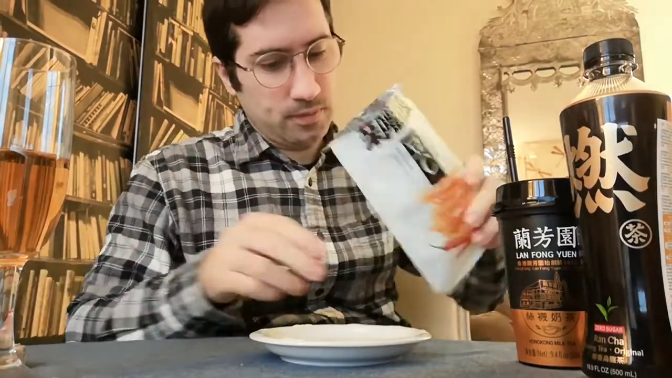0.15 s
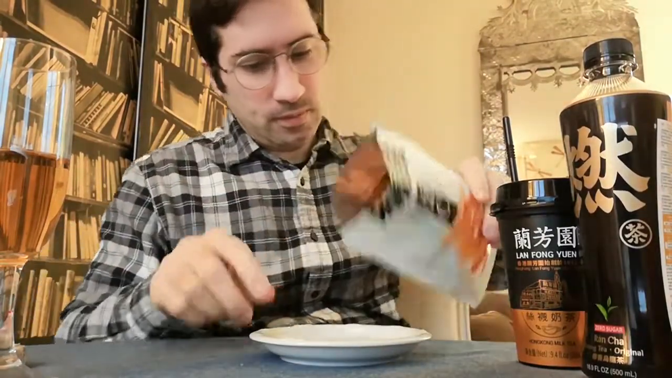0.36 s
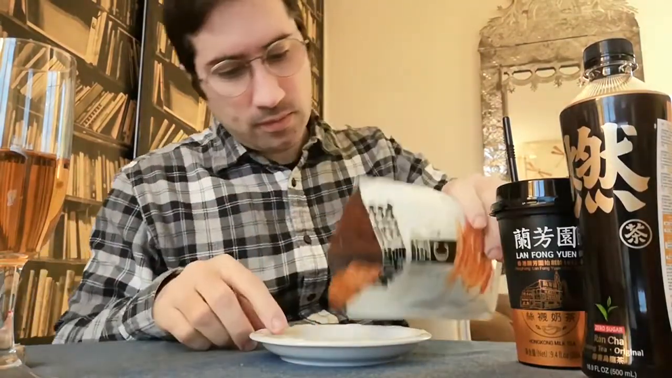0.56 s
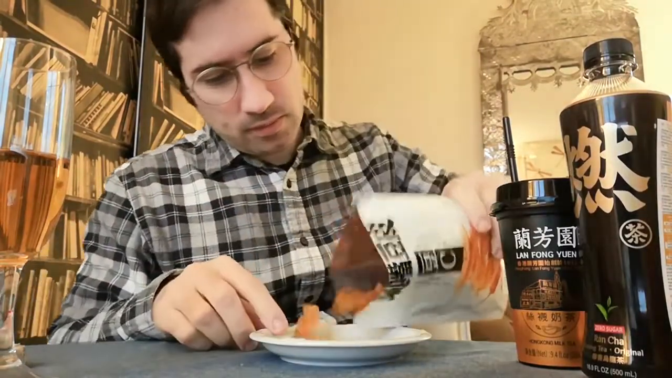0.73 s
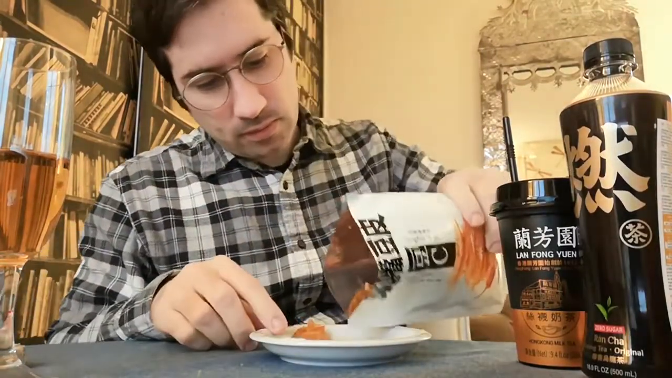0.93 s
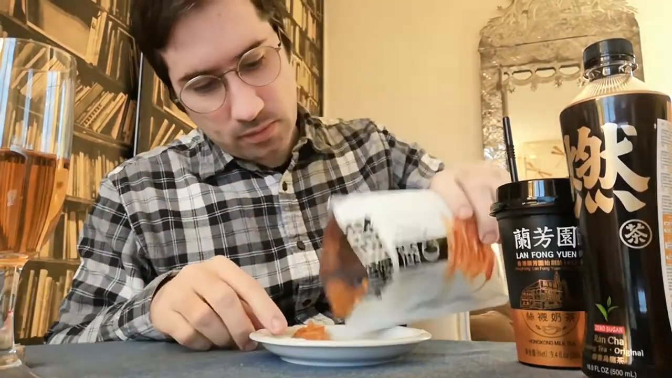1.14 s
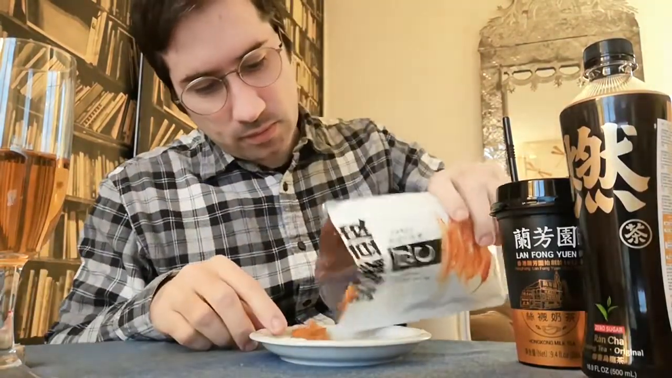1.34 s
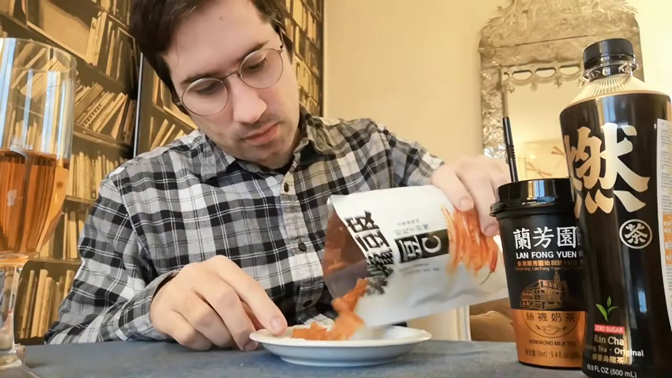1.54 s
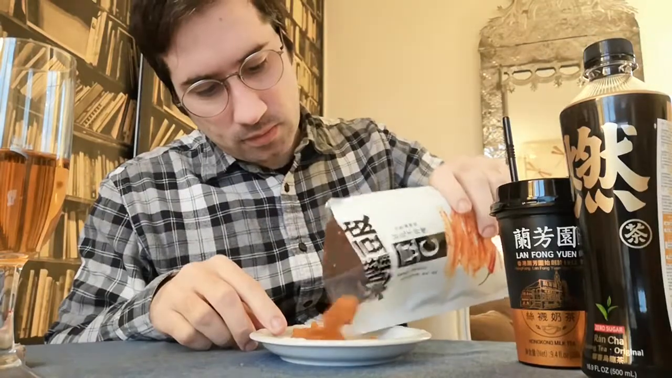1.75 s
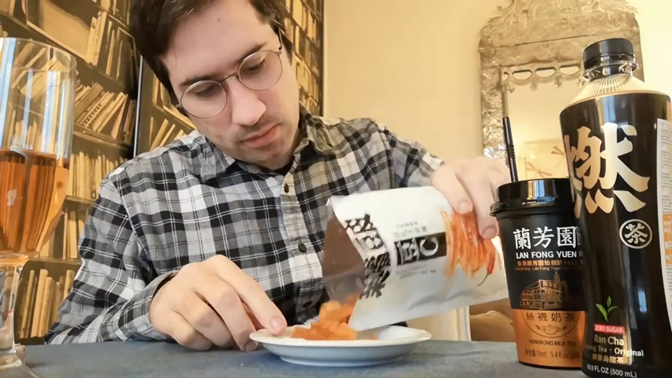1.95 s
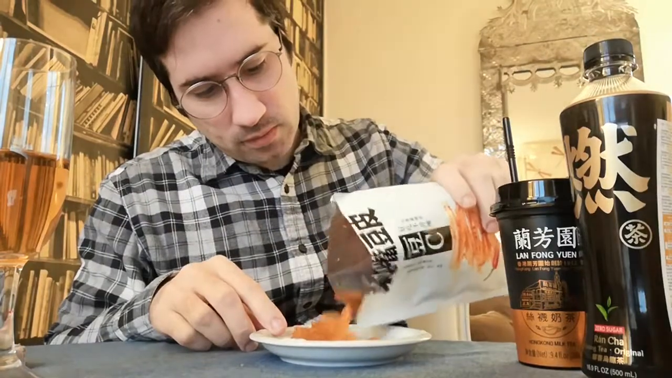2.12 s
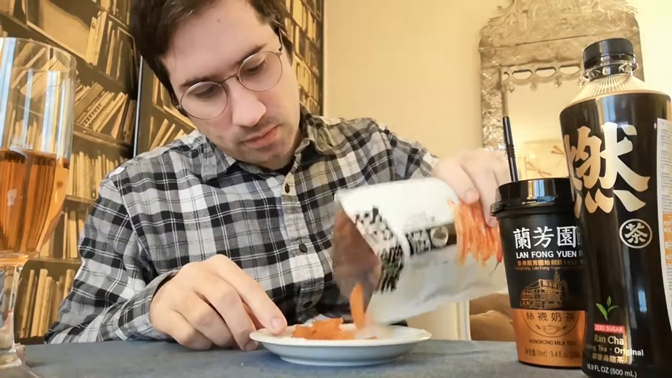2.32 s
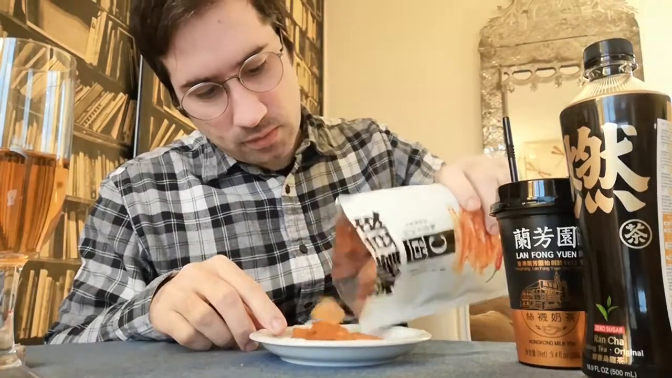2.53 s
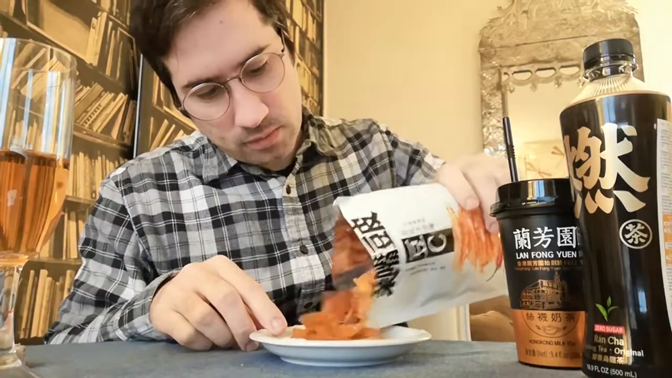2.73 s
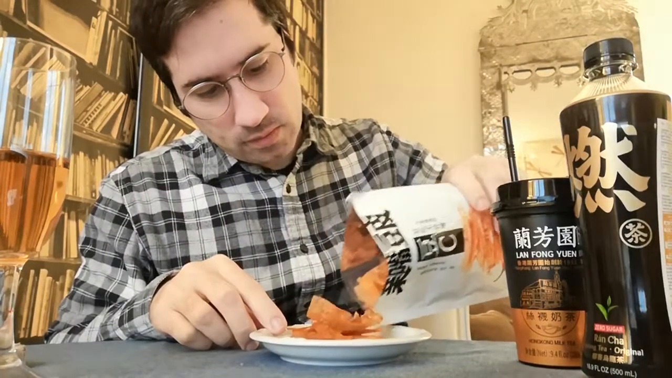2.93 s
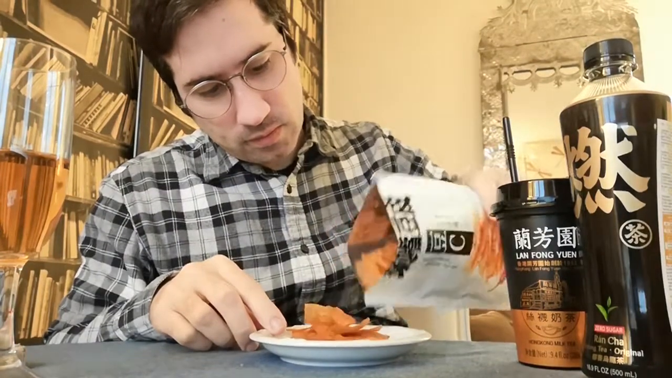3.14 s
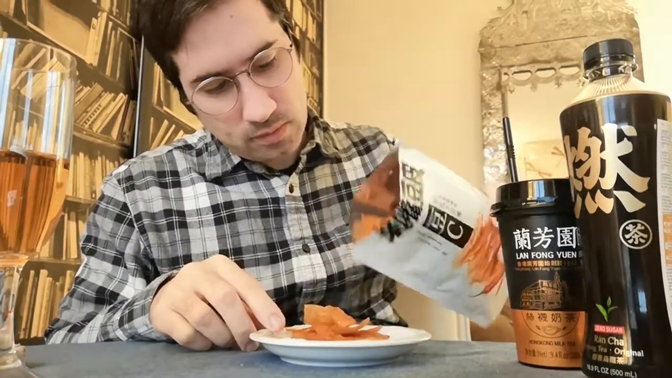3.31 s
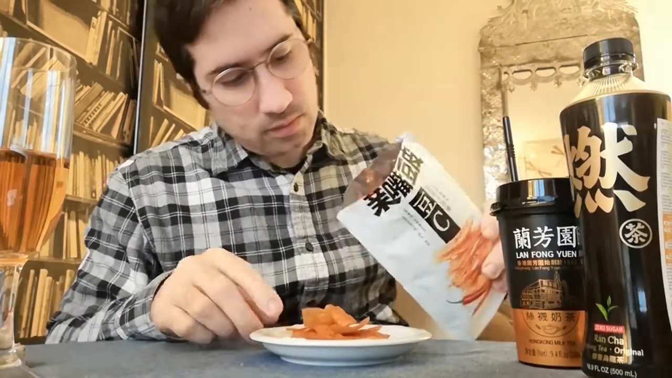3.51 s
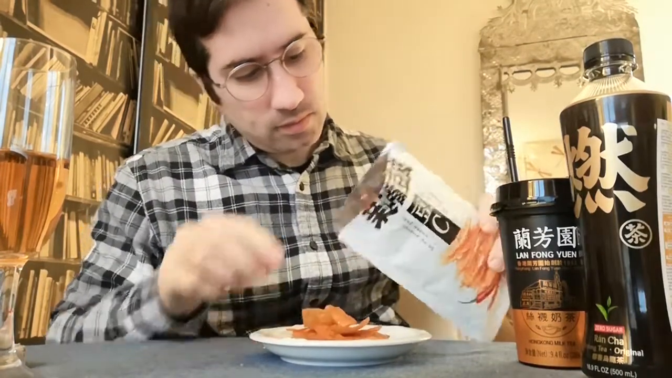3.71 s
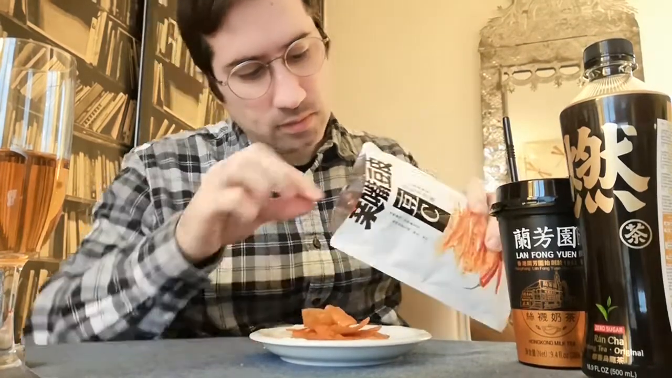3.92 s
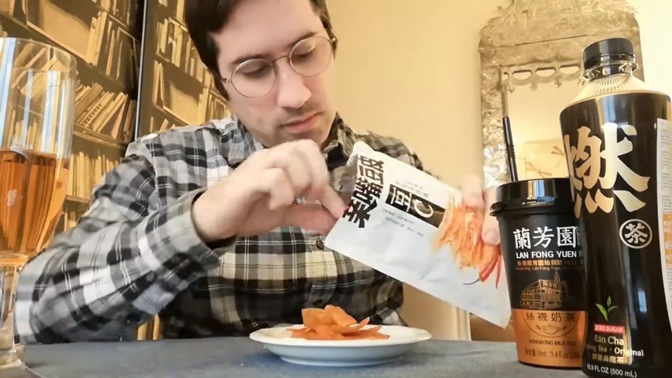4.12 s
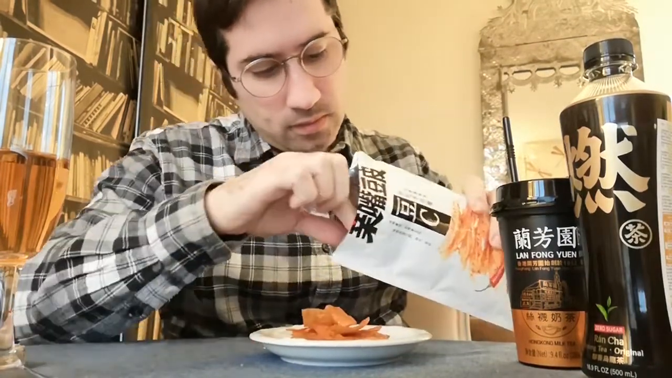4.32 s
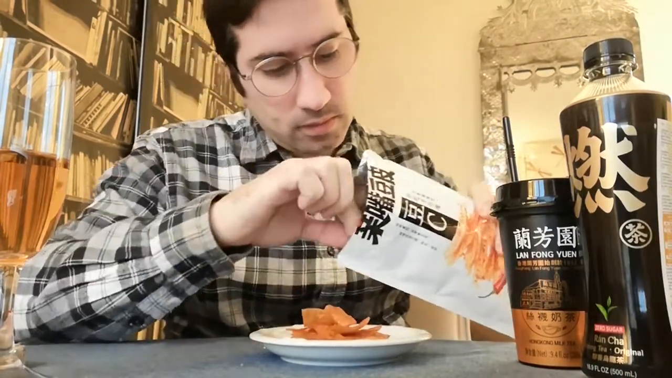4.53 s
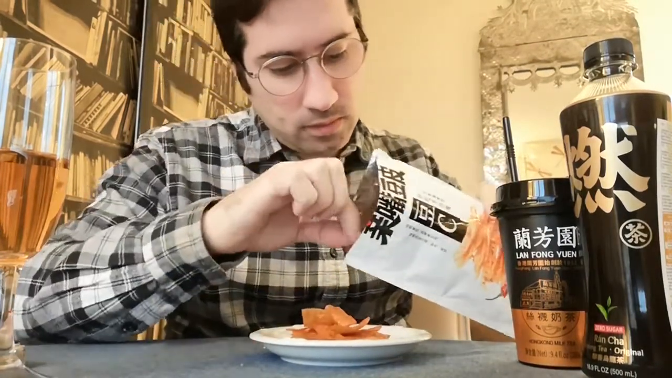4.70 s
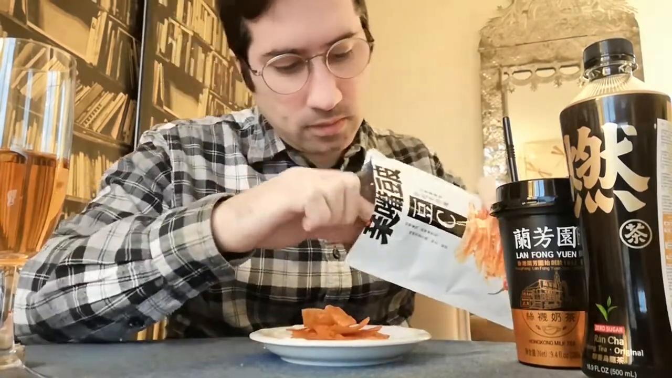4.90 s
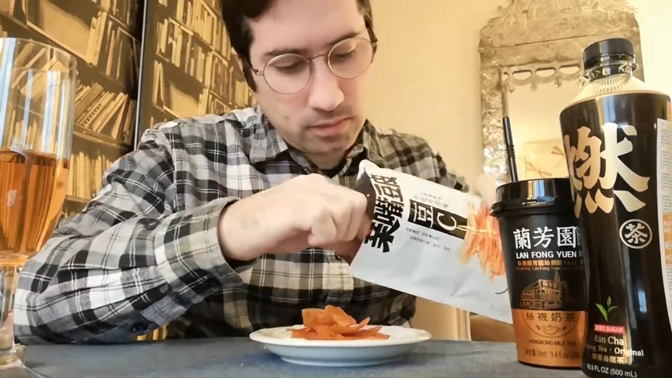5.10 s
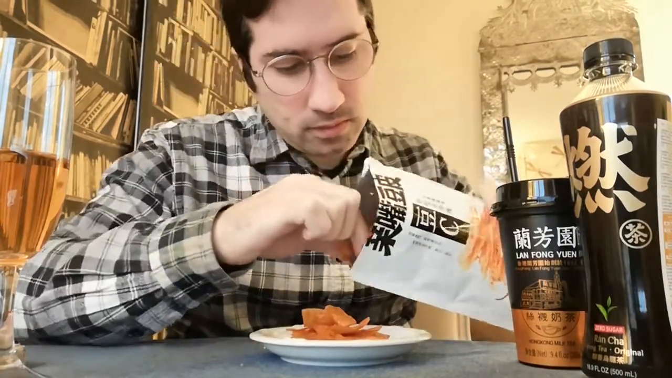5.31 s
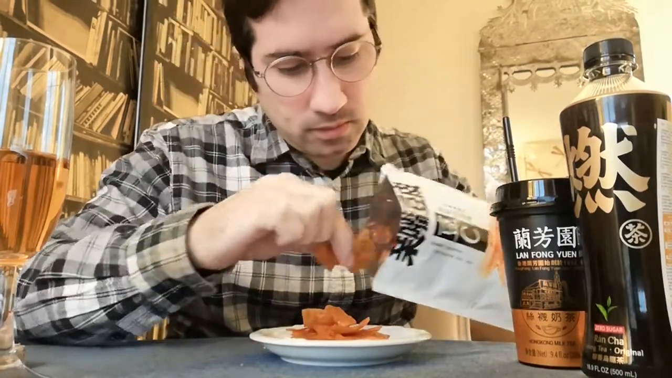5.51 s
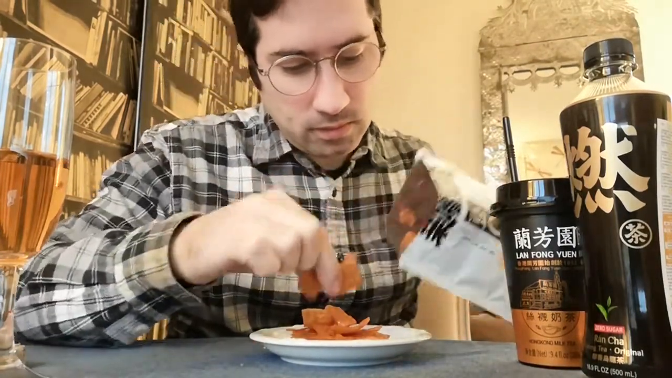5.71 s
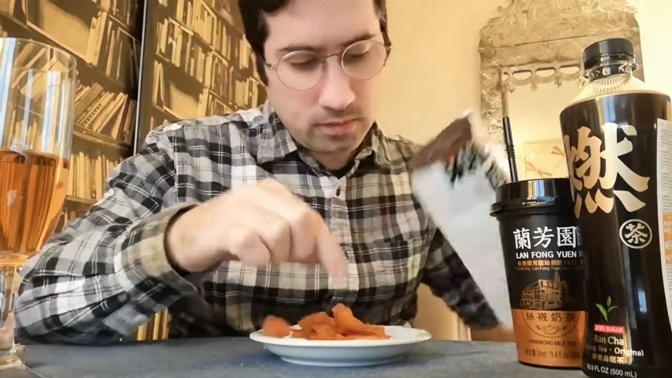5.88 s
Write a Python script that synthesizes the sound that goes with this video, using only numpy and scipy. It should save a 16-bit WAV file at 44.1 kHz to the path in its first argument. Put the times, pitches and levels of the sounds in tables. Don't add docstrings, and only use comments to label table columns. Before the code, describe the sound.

In a small quiet room, a stiff snack bag creases and snaps as it is lifted and tipped. About a dozen uneven sharp taps on a china plate rim follow, each with a short hollow bag boom, soft table thud and faint ring, while dry flakes slide and tick. A brief quiet gap follows, then fingers dig in the bag with one loud pop and small crinkles. Close stereo microphone, bag on the right.

```python
import sys
import numpy as np
from scipy import signal
from scipy.fft import rfft, irfft, next_fast_len
from scipy.io import wavfile
from scipy.ndimage import uniform_filter1d, minimum_filter1d, map_coordinates

SR = 44100
rng = np.random.default_rng(int(sys.argv[2]) if len(sys.argv) > 2 else 0)


def voltage_ratio(decibels):
    exponent = np.asarray(decibels, float) / 20
    return 10 ** exponent


def persist_wave(psi):
    counts = np.round(np.clip(psi, -1, 1) * 32767).astype(np.int16)
    wavfile.write(sys.argv[1], SR, np.atleast_2d(counts).T)


N = 262395

# (time [s], click peak [dB], table thud [dB], plate ring [dB], bag boom [dB])
RIM_TAPS = [(0.836, -15, -23, -24, -5), (0.9806, -22, -21, -28, -8), (1.1128, -18, -23, -25.5, -7),
            (1.261, -11.5, -36, -24, -9), (1.4153, -11.5, -30, -27, -8), (1.51, -29.5, -12, -29, -12),
            (1.5703, -15, -25.5, -28.5, -8), (1.6919, -17, -27.5, -24.5, -9), (2.0158, -26, -23, -29, -10),
            (2.2774, -15, -30.5, -23.5, -9), (2.4849, -18.5, -26, -37, -22),
            (2.5881, -17.5, -31.5, -23, -10), (2.7453, -15.5, -28, -23.5, -7)]
PAN_SCATTER_DB = 2.5


def along(points, hz):
    f, v = np.transpose(points)
    return np.interp(np.log(hz + 1), np.log(f + 1), v)


def unit(x):
    return x / np.sqrt(np.mean(x ** 2) + 1e-20)


def peak_one(pair):
    equal = pair / np.linalg.norm(pair, axis=1)[:, None]
    return equal * np.linalg.norm(pair[0]) / abs(pair[0]).max()


def filtered(x, response):
    m = next_fast_len(N + SR // 2)
    return irfft(rfft(x, m) * response(np.fft.rfftfreq(m, 1 / SR)), m)[..., :N]


def bandpass(x, low_hz, high_hz):
    return signal.lfilter(*signal.butter(2, [low_hz, high_hz], "band", fs=SR), x)


def causal(points, scale=1, size=2048):
    c = irfft(np.log(voltage_ratio(scale * along(points, np.fft.rfftfreq(size, 1 / SR)))))
    c[1:size // 2] *= 2
    c[size // 2 + 1:] = 0
    return irfft(np.exp(rfft(c)))[:size // 2]


def resonant(hz, modes):
    total = 0
    for k, (centre, width, db) in enumerate(modes):
        mode = 1j * hz * width / (centre * centre - hz * hz + 1j * hz * width)
        total = total + (-1) ** k * voltage_ratio(db) * mode
    return total


def add(track, s, sound):
    part = track[..., round(s * SR):][..., :sound.shape[-1]]
    part += sound[..., :part.shape[-1]]


def taps():
    # (frequency [Hz], level [dB])
    tap_tone = [(60, 2.5), (200, 0), (600, -3), (1000, 4.5), (2400, 3.5), (4700, -5), (7000, -6),
                (10000, -19), (15000, -51)]
    # (delay [ms], gain)
    rebounds = [(.5, 0.12), (.9, 0.012), (1.35, 0.021), (1.622, -0.3), (2.1, 0.13), (2.5, 0.12),
                (3.1, 0.058), (3.6, 0.13)]
    # (frequency [Hz], level [dB], t60 [s])
    bag_modes = [(890, -3, .013), (1230, -6, .012), (1480, -5, .012), (2170, -5, .011), (300, -16, .016)]
    # (frequency [Hz], level [dB])
    rim_comb = [(480, 0), (670, -8), (820, 1), (1400, 1), (2300, 3), (3300, -3), (4800, 1), (8000, -1)]
    # (time [s], ring [dB])
    touches = [
        (1.02, -68),
        (1.801, -59),
        (2.54, -58),
        (3.22, -72),
        (3.332, -76),
        (3.37, -75),
        (3.41, -68),
        (3.45, -68),
        (3.49, -73),
    ]
    # (time [s], level [dB])
    bumps = [
        (.004, -60),
        (.12, -60),
        (.452, -52),
        (.535, -57),
        (.585, -59),
        (.728, -58),
        (2.05, -60),
        (2.66, -56),
        (4.25, -66),
        (4.43, -67),
    ]
    soft_hz = 2640
    wall_ms, wall_db = 9.8, -19
    boom_late_s, boom_scatter = .0022, .04

    click, thud, ring = np.zeros(N), np.zeros(N), np.zeros((2, N))
    t = np.arange(900) / SR
    pulse = causal(tap_tone)
    pulse = -pulse / abs(pulse).max()
    dull = signal.lfilter(*signal.butter(2, soft_hz, fs=SR), pulse)
    for s, db, thud_db, ring_db, bag_db in RIM_TAPS:
        add(click, s + 0.000915, voltage_ratio(db + 3.5) * pulse)
        add(click, s + wall_ms / 1000, voltage_ratio(db + wall_db) * (pulse[6:] - pulse[:-6]))
        scatter = rng.standard_normal((len(rebounds), 2))
        for (ms, gain), (late, size) in zip(rebounds, scatter):
            rebound_s = s + 0.000858 + (ms + 0.022 * late) / 1000
            add(click, rebound_s, voltage_ratio(db + 10 + 1.5 * size) * gain * dull)
        boom = np.zeros(len(t))
        for hz, level, t60 in bag_modes:
            pitch_hz = hz * (1 + boom_scatter * rng.normal())
            boom += voltage_ratio(level - 60 * t / t60) * np.sin(2 * np.pi * pitch_hz * t)
        add(click, s + boom_late_s, voltage_ratio(db + bag_db) * boom)
        add(thud, s + 0.0012, voltage_ratio(db + thud_db + 24) * np.hanning(60))
        add(ring, s + 0.001155, plate(db + ring_db))
    for s, db in bumps:
        add(thud, s, voltage_ratio(db + 24) * np.hanning(200))
    for s, db in touches:
        add(ring, s, plate(db))
    return signal.fftconvolve(click, causal(rim_comb))[:N], filtered(thud, table) * voltage_ratio(-8.5) + ring


def plate(db):
    # (frequency [Hz], level [dB], t60 [s])
    china_modes = [(766, -11, .4), (1195, -10, .3), (1521, -11, .4), (1694, -10, .3), (1812, -7, .3),
                   (1821, -3, .48), (2156, -8, .4), (4171, -14, .32), (6826, -12, .32)]
    t = np.arange(SR // 3) / SR

    def flutter():
        return map_coordinates(rng.standard_normal(40), [t * 60], order=1)

    ring = 0
    for hz, level, t60 in china_modes:
        level_db = level + rng.normal(0, 2, (2, 1)) + 1.1 * flutter() - 60 * t / t60
        phase = 2 * np.pi * hz * t + 0.37 * flutter() + rng.uniform(0, 2.1, (2, 1))
        ring = ring + voltage_ratio(level_db) * np.sin(phase)
    return voltage_ratio(db) * ring * (1 - np.exp(-t / 0.0038))


def table(hz):
    # (frequency [Hz], width [Hz], level [dB])
    wood_modes = [(93, 120, -4), (169, 33.5, 6.5), (243.3, 30, 2.5), (313.5, 75, 1)]
    low_hz = 50
    return resonant(hz, wood_modes) * (1j * hz / (low_hz + 1j * hz)) ** 2


def snaps():
    # (time [s], peak [dB], panel pitch [Hz], crack [dB])
    tipping = [(0.0, -27, 1010, -26), (0.006, -26.5, 1890, -37), (0.028, -37, 1030, -8),
               (0.054, -40, 1450, -28), (0.113, -40, 1090, -15), (0.123, -19.5, 1690, -20),
               (0.164, -43, 2640, -18), (0.298, -43.5, 1040, -33), (0.316, -40.5, 1040, -35),
               (0.344, -39, 780, -36), (0.387, -53, 783, -21), (0.416, -27.5, 1220, -45),
               (0.441, -47, 1520, -27), (0.451, -39, 2040, -31), (0.476, -41, 2120, -14),
               (0.513, -42, 1470, 4), (0.53, -27, 2460, -15), (0.537, -36, 890, -1), (0.544, -31, 1710, -1),
               (0.558, -35.5, 1230, -19), (0.582, -34.5, 1620, -11), (0.614, -44, 1570, 7.5),
               (0.639, -45, 1670, -20), (0.692, -37.5, 2700, -8), (0.709, -45, 1830, 10),
               (0.749, -51, 641, -10), (0.768, -57, 1670, -21)]
    # (time [s], peak [dB], panel pitch [Hz], crack [dB])
    pouring = [(1.159, -35, 1650, -27), (1.326, -43.5, 1820, 7.5), (1.444, -33, 1720, -7),
               (1.511, -33, 1510, -11), (1.548, -34, 1680, -13), (1.774, -41, 890, -3),
               (1.839, -44, 1640, -18), (1.872, -49.5, 2760, 1.5), (1.909, -44.5, 5300, -2.5),
               (2.006, -42, 1710, -20), (2.055, -45, 496, 1.5), (2.071, -38.5, 1780, -11),
               (2.152, -47, 1600, -29), (2.201, -53, 767, -3), (2.412, -39.5, 1770, -27),
               (2.463, -47, 926, -18.5), (2.478, -34, 2200, -8), (2.61, -25.5, 1780, -22),
               (2.645, -28, 1550, -9), (2.657, -32.5, 1230, 0.5), (2.686, -39, 1470, -19),
               (2.73, -42, 902, 4), (2.773, -32.5, 1810, -5.5), (2.837, -30, 1420, -20),
               (2.861, -41, 2510, -22.5), (2.912, -36, 2550, -27), (2.957, -51.5, 2660, 4),
               (3.027, -48, 950, -8), (3.171, -62, 2640, -15)]
    # (time [s], peak [dB], panel pitch [Hz], crack [dB])
    digging = [(3.628, -58.5, 1100, -29.5), (3.719, -60.5, 974, -3), (4.238, -55, 840, -1),
               (4.262, -54.5, 490, -13.5), (4.4254, -16, 2400, -19), (4.4268, -28, 2700, -22),
               (4.4285, -30, 1700, -20), (4.429, -44, 580, -30), (4.532, -33, 1100, -8),
               (4.632, -54, 1570, -25), (4.669, -37.5, 1300, -4.5), (4.679, -45, 724, -5),
               (4.722, -55, 2200, -15), (4.743, -43.5, 2260, -13), (4.868, -58.5, 910, -25),
               (5.052, -51, 690, -23), (5.128, -38.5, 1090, -29), (5.145, -32, 1200, -44),
               (5.157, -36, 1660, -8), (5.163, -45, 2240, -28), (5.191, -55, 895, -21),
               (5.231, -45, 830, -11), (5.26, -53, 921, -16), (5.312, -53, 685, -19),
               (5.387, -53, 635, -29), (5.43, -53, 2050, -13), (5.473, -58, 920, -8)]
    # (frequency [Hz], level [dB])
    crack_tone = [(300, -43.5), (1000, 0.5), (2500, -0.5), (5000, -10.5), (7500, 0.5), (9500, -17.5),
                  (15000, -50)]
    # (creases, puff [dB], left-right [dB])
    grips = [(tipping, -17.5, -3.5), (pouring, -18.5, -4.5), (digging, -18, -3)]
    puff_lag = 0.32

    near, far = np.zeros((2, N)), np.zeros(N)
    t = np.arange(600) / SR
    crack_pulse = causal(crack_tone)[:300]
    bag_air = signal.butter(1, [170, 900], "band", fs=SR)
    pop = -1. * (t == 0)
    for creases, puff_db, pan_db in grips:
        for s, db, hz, crack_db in creases:
            shiver_gain = .3 * voltage_ratio(-1.2 * max(db + 25, 0))
            shiver = pop + shiver_gain * rng.standard_normal(len(t)) * np.exp(-t / .0016)
            release = [shiver, pop]
            panel = peak_one(bandpass(release, hz / 1.606, hz * 1.467))
            crack = peak_one(signal.lfilter(crack_pulse, 1, release))
            close, distant = voltage_ratio(db + 2.5) * panel + voltage_ratio(db + crack_db + 6.5) * crack
            puff_level_db = db - puff_lag * (db + 39.5) + puff_db + 8
            puff = voltage_ratio(puff_level_db) * peak_one(signal.lfilter(*bag_air, release))[0]
            spot_db = pan_db + PAN_SCATTER_DB * rng.normal()
            add(near, s + .0008, voltage_ratio(spot_db * np.array([[.5], [-.5]])) * close + puff)
            add(far, s + .0008, distant + 0.42 * puff)
    return near, far


def shake():
    # (strongest [s], fade per 20 dB [s], rub [dB], ticks over rub [dB],
    # rumble over rub [dB])
    arm_strokes = [(0.0, 0.0771, -29.5, -15, -18), (0.33, 0.3, -61, -14, -8.5),
                   (0.46, 0.17, -52, -20, -0.5), (0.54, 0.05, -40, -2, -9), (0.585, .07, -45, -10, -5.5),
                   (0.72, 0.3, -56, -3, -2), (1.36, 0, -50, -3, -14), (1.46, 0.18, -44.5, -23, -4.5),
                   (1.56, 0.12, -53.5, -11, 4), (1.88, .15, -62, -3, 0.5), (2.03, .15, -54.5, -12, -11),
                   (2.17, 0.06, -62, -12, 0), (2.45, 0.18, -51, -16, -7.5), (2.655, 0.1071, -39, -5, -3),
                   (2.828, 0.0673, -48, 0.5, -0.5), (2.99, 0.26, -63, -5.5, -7),
                   (3.62, 0.2, -64.5, -18.5, -2.5), (4.26, 0.1, -60, -9, -3), (4.5, 0.21, -57, -6, -6),
                   (4.69, .14, -60, -10, -3), (5.05, 0.24, -57, -5.5, -10.5), (5.17, 0.13, -55, -11.5, -12),
                   (5.24, 0.21, -54, -9, -8.5), (5.32, 0.19, -59, -8, -12)]
    rise_share = 0.8
    spill_db, spill_ticks_db, spill_rumble_db, spill_fade_s = -29, -9, -11, 0.18

    strokes = [(*row, rise_share) for row in arm_strokes]
    for s, db, *_ in RIM_TAPS:
        strokes.append((s, spill_fade_s, db + spill_db, spill_ticks_db, spill_rumble_db, .02))
    t, power = np.arange(0, N, 32) / SR, 0
    for s, fade_s, db, ticks_db, rumble_db, rise in strokes:
        level_db = db - 20 * np.where(t < s, (s - t) / rise, t - s) / fade_s
        power = power + voltage_ratio(level_db + np.array([[0], [ticks_db], [rumble_db]])) ** 2
    return [np.interp(np.arange(N) / SR, t, row) for row in np.sqrt(power)]


def grains(rate, spread_db, tone):
    clumps = map_coordinates(rng.standard_normal(500), [np.linspace(0, 499, N)])
    hits = rng.uniform(size=N) < rate / SR * voltage_ratio(6 * clumps)
    size_db = spread_db * np.minimum(rng.exponential(size=N), 4.)
    sizes = voltage_ratio(size_db) * rng.standard_normal(N)
    return unit(signal.fftconvolve(hits * sizes, causal(tone))[:N])


def rustle():
    # (frequency [Hz], level [dB])
    rub_tone = [(200, -32), (500, -6.5), (900, -3), (2000, 3), (3200, -3.5), (5000, -29), (15000, -62)]
    # (frequency [Hz], level [dB])
    tick_tone = [(400, -30), (1200, -2), (2500, 1.5), (4000, -3.5), (6000, -3), (8000, -5), (11000, -14.5),
                 (15500, -25)]
    rub_gain, tick_gain, rumble_gain = shake()
    rub = rub_gain * grains(1100, 3.3, rub_tone) * voltage_ratio(-2.5)
    ticks = tick_gain * grains(2400, 2.7, tick_tone) * voltage_ratio(-2)
    rumble = rumble_gain * unit(filtered(rng.standard_normal(N), table))
    return rub + ticks, rumble


def flakes():
    # (time [s], peak [dB], centre frequency [Hz])
    flake_hits = [(.524, -46, 8500), (.534, -36, 9500), (.544, -38, 10000), (.551, -42, 9000),
                  (.56, -46, 8500), (.57, -42, 6000), (.616, -40, 9000), (.67, -52, 5000),
                  (.711, -35, 6000), (.72, -46, 6000), (.728, -50, 7500), (.749, -48, 7000),
                  (1.128, -48, 10000), (1.327, -42, 9000), (1.339, -49, 10000), (1.354, -50, 10000),
                  (1.393, -49, 5000), (1.448, -34, 5000), (1.52, -44, 6000), (1.557, -44, 7000),
                  (1.589, -44, 9500), (1.611, -50, 9500), (1.662, -54, 9500), (1.73, -41, 5000),
                  (1.777, -42, 5000), (2.574, -42, 2500), (2.602, -35, 5500), (2.637, -33, 5000),
                  (2.642, -29, 7500), (2.653, -40, 10000), (2.66, -28, 5500), (2.665, -35, 6000),
                  (2.677, -36, 6500), (2.682, -34, 1900), (2.693, -38, 2200), (2.725, -39, 6000),
                  (2.729, -42, 7000), (2.76, -35, 5000), (2.819, -39, 5000), (2.825, -43, 7000),
                  (2.851, -43, 6000), (2.874, -44, 2700), (2.883, -43, 2700), (2.934, -50, 7000),
                  (4.533, -36, 2500), (4.534, -41, 4800), (4.669, -39, 7500), (4.681, -50, 7500),
                  (4.252, -58, 500), (4.27, -58, 900), (4.285, -62, 1500), (5.0, -58, 1100),
                  (5.03, -58, 900), (5.06, -57, 2700), (5.083, -56, 1400), (5.173, -50, 2200),
                  (5.24, -52, 900), (5.263, -56, 2600), (5.316, -54, 1600)]
    decay_s, width = .0009, 1.4
    out, t = np.zeros((2, N)), np.arange(300) / SR
    for s, db, hz in flake_hits:
        burst = rng.standard_normal(len(t)) * np.exp(-t / decay_s)
        tick = bandpass(burst, hz / width, hz * width)
        spot_db = PAN_SCATTER_DB * rng.normal() * np.array([[.5], [-.5]])
        add(out, s - .0005, voltage_ratio(db + spot_db) * tick / abs(tick).max())
    return out


def squeak():
    # (time [s], pitch [Hz], level [dB])
    slip = [
        (3.011, 4900, -69),
        (3.03, 4750, -78),
        (3.04, 4900, -72),
        (3.048, 4900, -53.5),
        (3.058, 4800, -77),
    ]
    s, hz, db = np.transpose(slip)
    t = np.arange(N) / SR
    rough_hz = 3600 * uniform_filter1d(rng.standard_normal(N), size=60)
    phase = 2 * np.pi * np.cumsum(np.interp(t, s, hz) + rough_hz) / SR
    return voltage_ratio(np.interp(t, s, db, -200, -200)) * np.sin(phase)


def ports(x):
    # (frequency [Hz], left-right [dB])
    port_balance = [(150, 0.5), (400, -5), (750, -14), (1200, 1), (2400, -5), (4500, 21), (5500, -18),
                    (6800, 18.5), (8200, -4), (10000, -13), (13000, -32)]
    left = np.pad(causal(port_balance, 1 / 2), (4, 0))
    right = np.pad(causal(port_balance, -1 / 2), (0, 4))
    return signal.fftconvolve(x, np.array([left, right]), axes=1)[:, :N]


def cavity(x):
    # (frequency [Hz], level [dB])
    capsule_tone = [(25, -24), (70, 4.5), (150, 2.5), (3600, -3), (4300, -2.5), (4800, 2.5), (5400, -3),
                    (6000, -4), (7200, -3), (8500, -5.5), (11000, -11.5), (15500, -21.5)]
    return signal.fftconvolve(x, causal(capsule_tone)[None], axes=1)[:, :N]


def room(x):
    # (frequency [Hz], t60 [s])
    decay = [(150, 0.51), (700, 0.21), (2000, 0.25), (5000, 0.29), (12000, 0.37)]
    # (frequency [Hz], level [dB])
    wall_tone = [(100, -9), (300, -2), (600, 1), (2000, -1.5), (5000, 3), (12000, -3)]
    out, step = np.zeros((2, N)), SR // 5
    for start in range(0, N, step):
        hz, t, z = signal.stft(rng.standard_normal((2, SR // 3)), SR, nperseg=256)
        level_db = along(wall_tone, hz)[:, None] - 60 * t / along(decay, hz)[:, None]
        tail = signal.istft(z * voltage_ratio(level_db), SR, nperseg=256)[1]
        tail[1] = shared_bass(tail)
        tail = tail / np.linalg.norm(tail[0])
        add(out, start / SR + .0025, signal.fftconvolve(x[None, start:start + step], tail, axes=1))
    return out


def shared_bass(pair):
    low = signal.lfilter(*signal.butter(2, 600, fs=SR), pair[0] - pair[1])
    return pair[1] + low


def air():
    # (frequency [Hz], density [dB per Hz])
    air_tone = [(20, -9), (32, -5), (45, -16), (62, -21), (90, -6), (170, -10), (240, -10.5), (330, -18.5),
                (550, -21.5), (1000, -24.5), (2200, -21), (4000, -28), (7500, -32.5), (9000, -39.5),
                (16000, -39.5)]
    # (frequency [Hz], left-right likeness)
    likeness = [(60, .99), (130, .92), (290, .45), (640, -.2), (1400, .2), (3100, -.1), (6800, 0),
                (15000, 0)]
    # frequency [Hz], level [dB rms], wander [Hz]
    motor = (49.3, -68.5, 5.08)
    air_db = -69.5

    def mid_side(hz):
        turn = np.arccos(np.clip(along(likeness, hz), -1, 1)) / 2
        return voltage_ratio(along(air_tone, hz)) * [np.cos(turn), np.sin(turn)]

    mid, side = filtered(rng.standard_normal((2, N)), mid_side)
    hum_hz, hum_db, wander_hz = motor
    drift, swell = (map_coordinates(rng.standard_normal(120), [np.linspace(0, 119, N)]) for _ in range(2))
    phase = 2 * np.pi * np.cumsum(hum_hz + wander_hz * drift) / SR
    hum = voltage_ratio(hum_db + 1.5 + 1.9 * swell) * np.sin(phase)
    return voltage_ratio(air_db) * np.array([mid + side, mid - side]) / np.std(mid) + hum


def gate(x, open_db, depth_db, hold=0.078):
    level = np.sqrt(abs(uniform_filter1d(np.mean(x ** 2, axis=0), size=256)))
    span = round(hold * SR)
    held = -minimum_filter1d(-level, size=span, origin=(span - 1) // 2)
    under_db = np.clip(2.3 * (20 * np.log10(held + 1e-9) - open_db), -depth_db, 0)
    return x * voltage_ratio(uniform_filter1d(under_db, size=400))


def scene():
    click, wood_and_china = taps()
    film, rumble = rustle()
    creases, creases_far = snaps()
    ticks = flakes()
    bag = click + film
    direct = ports(bag + creases + ticks + squeak()) + wood_and_china
    walls = voltage_ratio(-3) * room(bag + creases_far + voltage_ratio(-3) * ticks.mean(0))
    heard = cavity(direct + walls)
    return gate(heard, open_db=-39, depth_db=3) + rumble + air()


def low_pass(x):
    return signal.sosfilt(signal.butter(12, 15950, fs=SR, output="sos"), x)


def record(dry):
    top_hz = 15750
    mix = filtered(dry, lambda hz: hz < top_hz)
    return low_pass(mix)


dry = scene()
out = record(dry)
persist_wave(out)
```